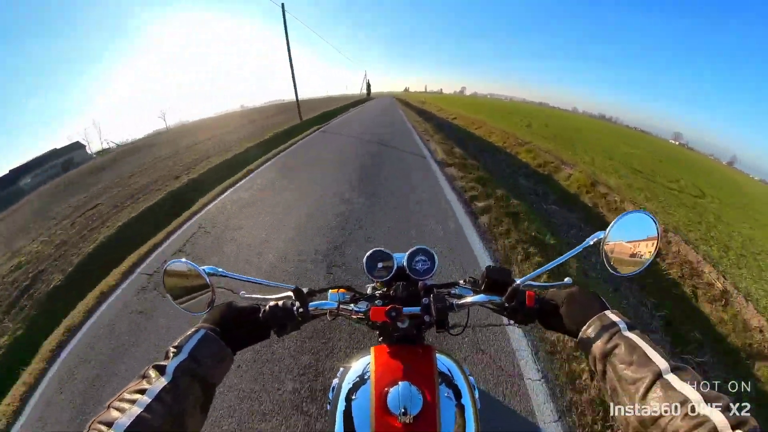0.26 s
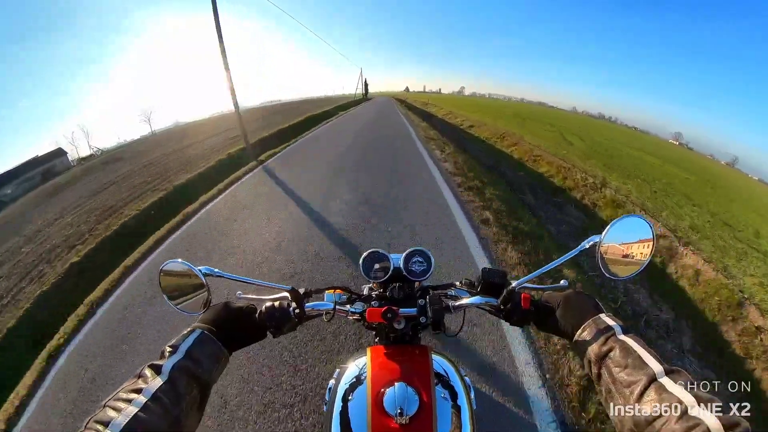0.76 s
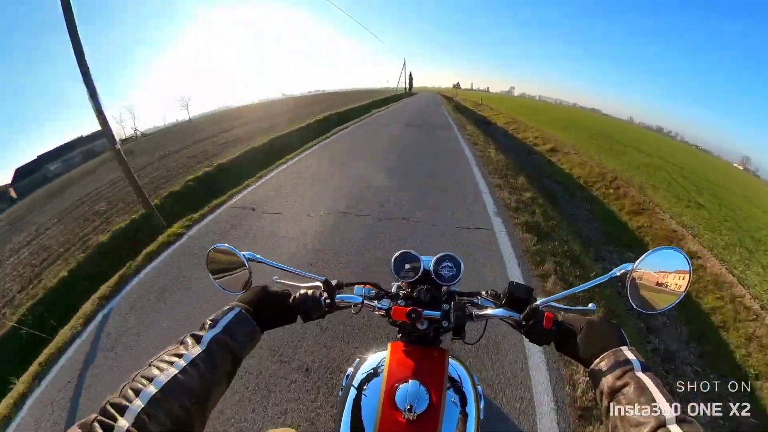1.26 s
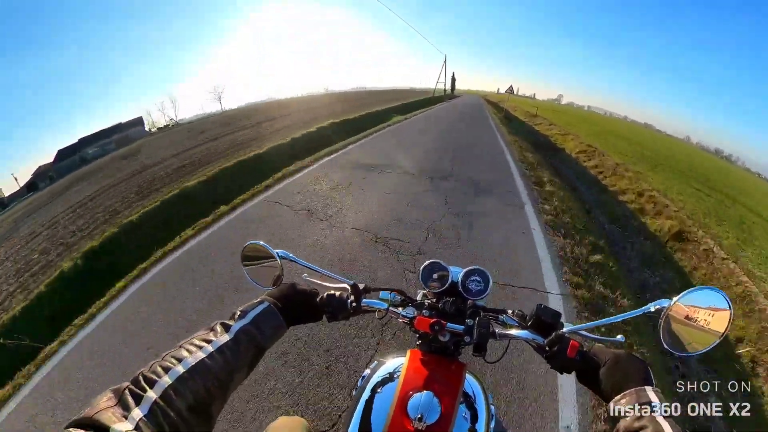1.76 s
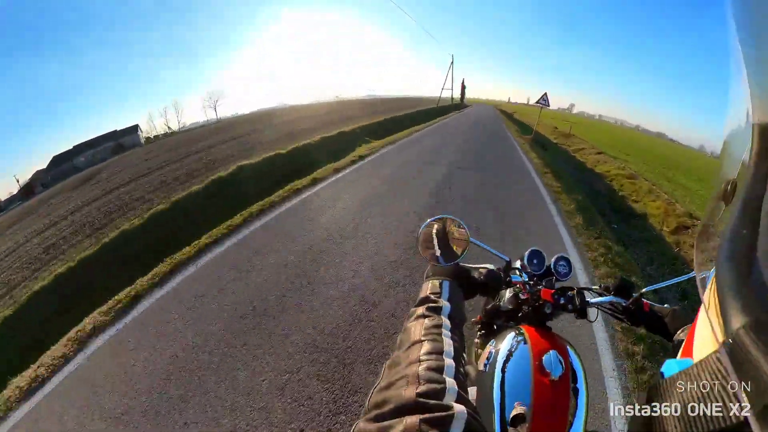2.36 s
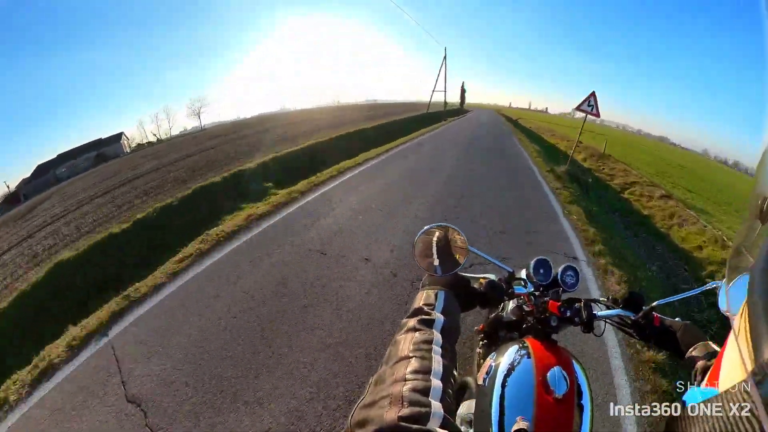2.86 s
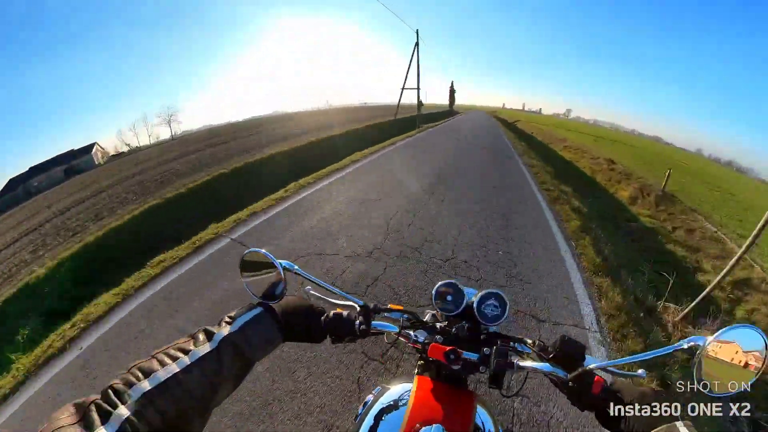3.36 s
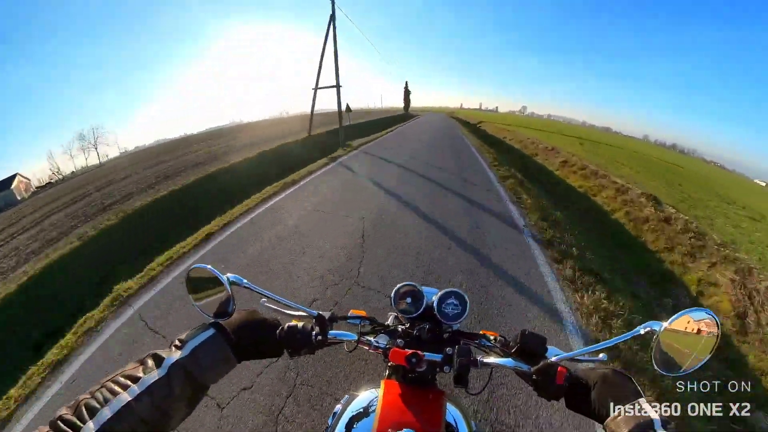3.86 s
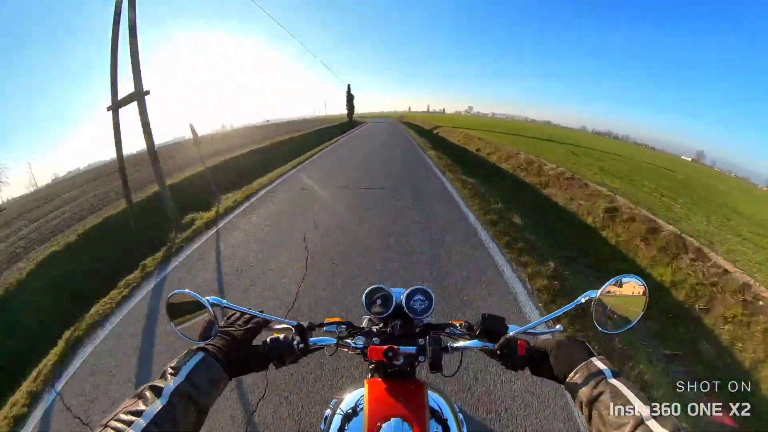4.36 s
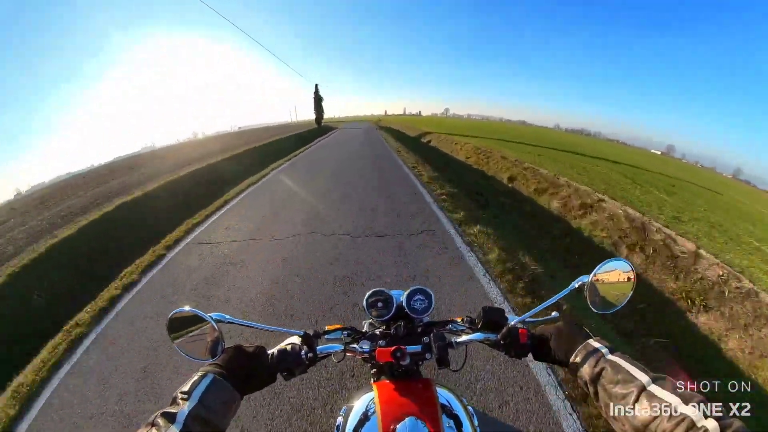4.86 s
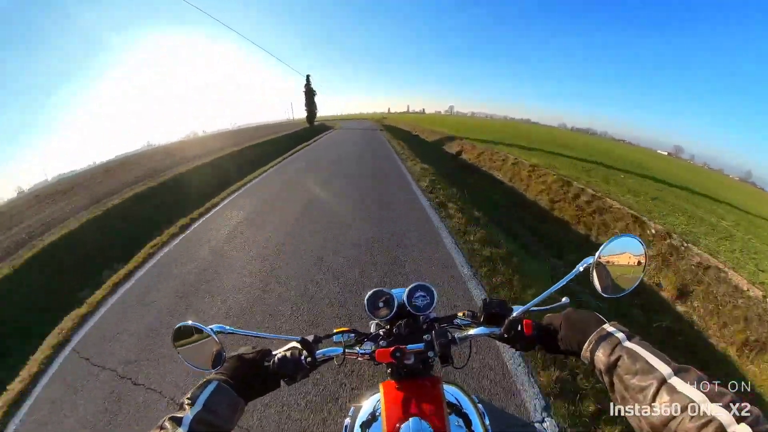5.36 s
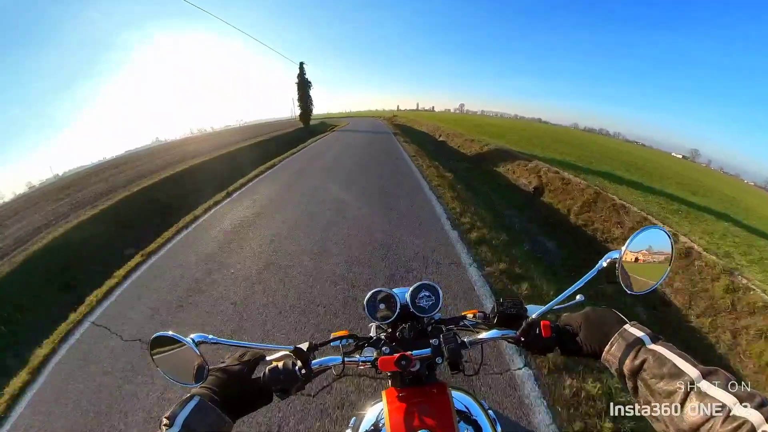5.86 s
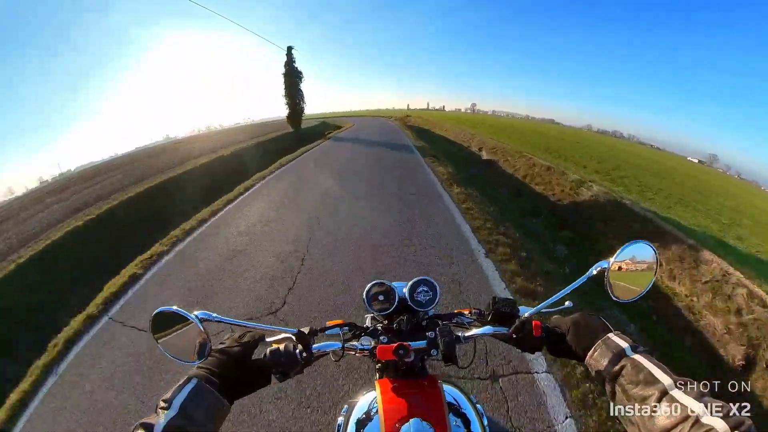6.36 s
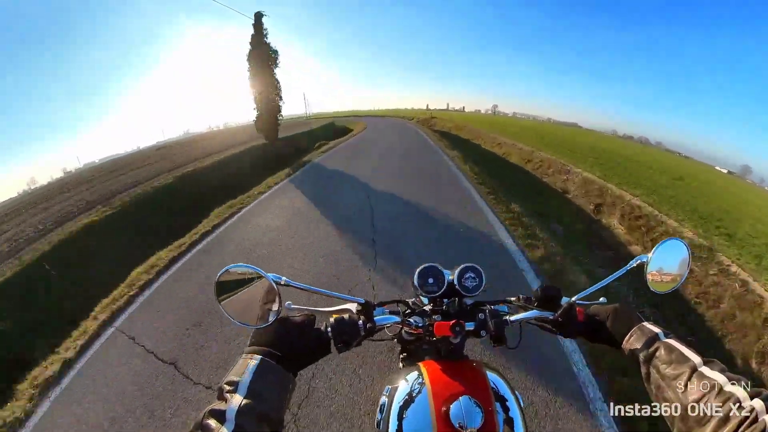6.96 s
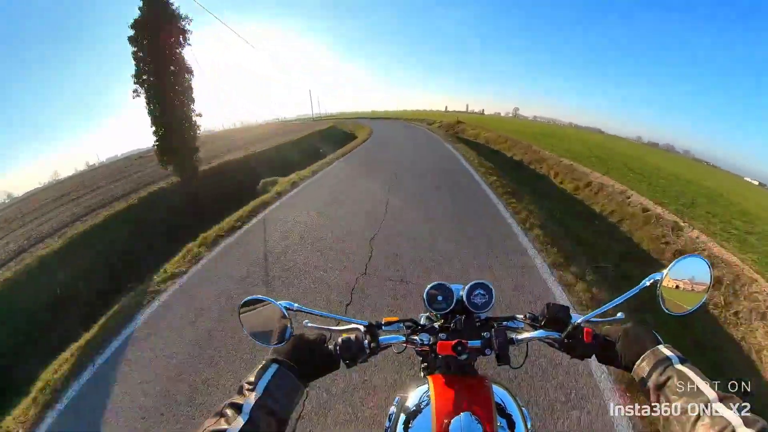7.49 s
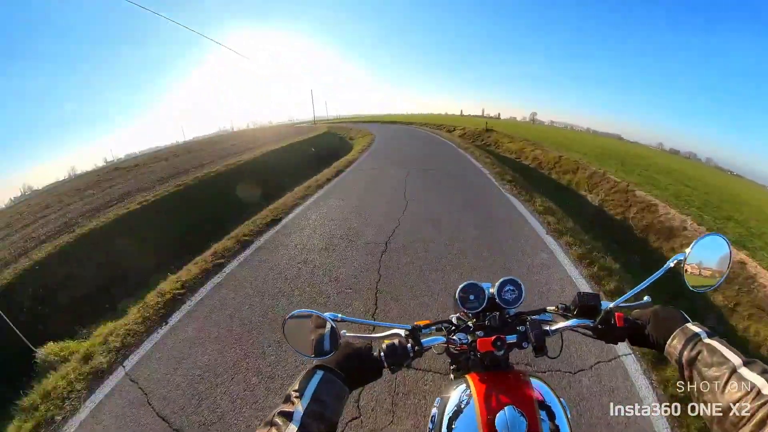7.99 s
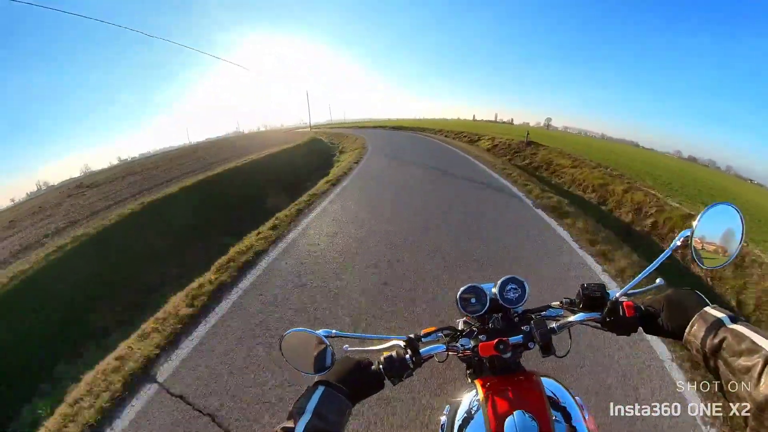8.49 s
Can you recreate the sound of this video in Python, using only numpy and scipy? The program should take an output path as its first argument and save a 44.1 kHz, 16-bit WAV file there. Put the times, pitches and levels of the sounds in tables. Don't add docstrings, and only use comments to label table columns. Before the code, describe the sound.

Raspy uneven motorcycle exhaust climbs in revs amid bump knocks and dropouts, drops quiet for a gear change around five seconds, then drives on.

```python
import sys
import numpy as np
from scipy import signal
from scipy.fft import rfft, irfft, next_fast_len
from scipy.io import wavfile
from scipy.ndimage import uniform_filter1d

SR = 44100
rng = np.random.default_rng(int(sys.argv[2]) if len(sys.argv) > 2 else 0)


def volts(x):
    e = np.asarray(x, float) / 20
    return 10 ** e


def master(y):
    cut = np.clip(np.atleast_2d(y).T, -1, 1)
    pcm = np.round(cut * 32767)
    wavfile.write(sys.argv[1], SR, pcm.astype(np.int16))


N = 384993

# [start_s, cycles_per_s]
ENGINE_SPEED = [(0, 20.843), (.8, 22.466), (1.6, 24.169), (3.4, 27.466), (4.5, 28.912), (4.76, 28.36),
                (5.12, 19.104), (5.22, 26.897), (5.3, 18.426), (5.45, 17.748), (5.9, 17.648),
                (6.02, 21.573), (6.3, 21.603), (6.6, 21.167), (8.3, 22.235), (8.73, 23.345)]
# [start_s, exhaust_db, rasp_db]
RIDER = [(0, -24, -42), (.26, -22.5, -47.5), (.55, -23, -40.5), (1.24, -23.5, -40.5), (1.4, -21, -37),
         (2.15, -22.5, -38), (2.7, -25, -49), (3.55, -22.5, -35.5), (4.15, -26, -39), (4.6, -24.5, -39.5),
         (5.2, -26, -46), (5.55, -35.5, -52.5), (6.1, -33, -47), (6.7, -25, -43), (7.18, -23, -46.5),
         (7.45, -23.5, -38.5), (8.3, -25, -42.5), (8.73, -23.5, -39)]
# [start_s, pressure_at_cut, pressure_at_return]
LOST_PACKETS = [
    (.3779, .085, .07),
    (.6179, -.09, -.065),
    (.8579, -.065, -.11),
    (1.0979, .12, .1),
    (1.5779, -.135, -.095),
    (2.0379, .03, .04),
]
PACKET_S = .02
USUAL_DB, USUAL_STRAIN_DB, USUAL_HZ = -22.5, -43, 23


def rms_one(x):
    return x / np.sqrt(np.mean(x ** 2) + 1e-20)


def in_time(rows):
    s, *columns = np.transpose(rows)
    return [np.interp(np.arange(N) / SR, s, c) for c in columns]


def swells(rows):
    t = np.arange(N) / SR
    return sum(volts(db) * np.exp(-.5 * ((t - s) / width) ** 2) for s, db, width in rows)


def noise():
    return rng.standard_normal(N)


def coloured(x, spectrum):
    size = next_fast_len(N)
    hz, db = np.transpose(spectrum)
    log_hz = np.log(np.arange(size // 2 + 1) * SR / size + 1)
    gain = volts(np.interp(log_hz, np.log(hz), db, -90, -90))
    return rms_one(irfft(rfft(x, size) * gain, size)[:N])


def drift(rate_hz):
    low_pass = signal.butter(2, rate_hz, fs=SR / 40, output="sos")
    slow = signal.sosfilt(low_pass, rng.standard_normal(N // 40 + 2002))
    settled = rms_one(slow[2000:])
    return np.interp(np.arange(N) / 40, np.arange(len(settled)), settled)


def ring(clicks, hz, t60):
    r = volts(-60 / (t60 * SR))
    w = 2 * np.pi * hz / SR
    return signal.lfilter([0, np.sin(w)], [1, -2 * r * np.cos(w), r * r], clicks + 1e-18)


def puffs(clicks, echoes):
    ms = np.arange(-600, 601) / SR * 1000
    shape = sum(h * np.exp(-.5 * ((ms - at) / w) ** 2) for at, h, w in echoes)
    return signal.fftconvolve(clicks, shape, "same")


def revs():
    return in_time(ENGINE_SPEED)[0] - USUAL_HZ


def shut():
    # [start_s, end_s]
    closings = [
        (4.76, 5.12),
        (5.26, 5.7),
    ]
    t, snap_s = np.arange(N) / SR, 0.014
    return sum(np.clip((t - a) / snap_s, 0, 1) * np.clip((b - t) / snap_s, 0, 1) for a, b in closings)


def crank():
    # [start_s, frames_gained]
    buffer_slips = [(.44, 1), (.485, -1), (.785, 1), (.858, 1), (.915, 1), (.95, 1), (1.222, 2), (1.3, -1),
                    (1.44, -2), (1.485, 1), (1.52, -1), (1.578, 2), (1.785, 1), (6.585, 1), (8.47, -1)]
    frame_s, start_cycles = .00725, .296
    gains = [(s, frames * frame_s) for s, frames in buffer_slips]
    gains += [(row[0], -PACKET_S) for row in LOST_PACKETS]
    jumps = np.zeros(N)
    for s, gained_s in gains:
        jumps[round(s * SR)] += gained_s * SR
    rate = in_time(ENGINE_SPEED)[0]
    return start_cycles + np.cumsum(rate * (1 + uniform_filter1d(jumps, size=40))) / SR


def once_a_cycle(cycles, at, spread_db, jitter_ms):
    marks = np.flatnonzero(np.diff(np.floor(cycles - at)) > 0)
    chance = rng.standard_normal((250, 2))[:len(marks)]
    moved = marks + (chance[:, 0] * jitter_ms * SR / 1000).astype(int)
    clicks = np.zeros(N)
    clicks[np.clip(moved, 0, N - 1)] = volts(spread_db * chance[:, 1])
    return clicks


def gate(cycles, marks, floor):
    height = floor
    for at, width, h in marks:
        distance = (cycles - at + .5) % 1 - .5
        height = height + h * np.exp(-.5 * (distance / width) ** 2)
    return height


def wind():
    # [pitch_hz, level_db_per_hz]
    wind_colour = [(15, -28.5), (28, -12), (45, -4.5), (70, 2), (110, -8.5), (200, -40.5)]
    # [centre_s, peak_db, width_s]
    gusts = [
        (.7, -33.5, .15),
        (2.1, -32.5, .4),
        (3.2, -34, 0.18),
        (4.08, -17, 0.051),
        (4.9, -20.5, .3),
        (5.7, -24, 0.93),
        (7.56, -18, 0.24),
        (8.73, -15, 0.17),
    ]
    lumpy = noise() * volts(4.0 * drift(12))
    return volts(-10) * (volts(-41) + swells(gusts)) * coloured(lumpy, wind_colour)


def jolts():
    # [centre_s, peak_db, pitch_hz, rise_ms]
    knocks = [(.496, -8, 188, 1.2), (.507, -12.5, 193, 3), (.538, -18, 654, 4), (.537, -20, 322, 4),
              (0.552, -9, 286, 4.1), (.567, -8.5, 225, 1.2), (.576, -10, 237, 2.9), (.7659, -5, 790, 0.73),
              (0.7658, -10, 1020, 0.96), (.765, -9, 470, 1.8), (.921, -12, 330, 1), (.93, -21, 695, 0.84),
              (1.207, -7, 234, 1.8), (1.2159, -1.5, 226, 1.4), (1.21, -20, 575, 5.2), (1.364, -3, 260, 3.1),
              (1.375, -13, 266, 1.66), (1.386, -11, 288, 5.6), (1.421, -8.5, 225, 13),
              (1.502, -27.5, 610, 2.2), (1.443, -19.5, 914, 1.6), (2.146, -18.5, 257, 8.4),
              (5.281, -27.5, 864, 0.64), (5.403, -14.5, 507, 1), (5.405, -16.5, 131, 7.8),
              (5.434, -25, 830, 0.65), (5.458, -21, 477, 2), (5.516, -21, 246, 1.5), (8.46, -28.5, 940, 3)]
    # [centre_s, peak_db, pitch_hz]
    rattles = [(0.4645, -29, 3420), (0.6737, -22.5, 3360), (.9178, -26, 3220), (.9378, -28, 3140),
               (1.0188, -25.5, 3520), (1.2128, -32, 3280), (1.317, -25, 3200), (1.3323, -26, 3100),
               (1.3588, -23, 2920), (1.4022, -30, 3500), (1.5404, -22, 3110), (1.5564, -26, 2800),
               (1.6018, -21, 2940), (1.6432, -19.5, 3340), (1.6834, -20.5, 3060), (1.7255, -22, 3200),
               (1.7669, -26, 3000), (2.0015, -21.5, 2850), (2.1026, -28, 3116), (2.183, -20, 3030),
               (2.459, -26.5, 3360), (2.5745, -26.5, 3310), (3.067, -29, 3180), (3.651, -19.5, 3140),
               (7.217, -32.5, 2900), (7.5868, -22, 3300)]
    rattle_rise_ms, fall_per_rise = 0.82, 1.72
    scuff = volts(-11) * coloured(noise(), [(100, -22.5), (250, 5.0), (600, -9.5), (1100, -16.5), (1600, -27)])
    grain = volts(3.0 * drift(160))
    steps = np.arange(-2600, 2600)
    ms = steps / SR * 1000
    out = np.zeros(N)
    for s, db, hz, rise in list(knocks) + [(s, db - 9, hz, rattle_rise_ms) for s, db, hz in rattles]:
        at = round(s * SR) + steps
        width = np.where(ms < 0, rise, rise * fall_per_rise)
        swell = volts(db) * np.exp(-.5 * (ms / width) ** 2)
        out[at] += swell * (grain[at] * np.cos(2 * np.pi * hz * ms / 1000) + scuff[at])
    return out


def chirp():
    # [time_s, pitch_hz, level_db]
    belt = [
        (5.6, 2500, -75),
        (5.64, 2360, -59),
        (5.72, 2240, -64),
        (5.81, 2150, -70),
        (5.845, 2450, -53),
        (5.885, 2520, -60),
        (5.9, 2750, -64),
        (5.99, 3040, -59),
        (6.02, 3100, -93),
    ]
    hz, db = in_time(belt)
    level = volts(db + 3 * drift(40))
    return level * np.sin(2 * np.pi * np.cumsum(hz + 35 * drift(60)) / SR)


def heat_shield(strain_db):
    # [pitch_hz, level_db_per_hz]
    shield_colour = [(1900, -31.5), (2150, -8.5), (2230, 2), (2320, -6.5), (2700, -12), (2950, -2.5),
                     (3100, -9), (3500, -27)]
    buzz_db = -60.5 + 1.58 * (strain_db - USUAL_STRAIN_DB) + 0.89 * revs()
    return volts(buzz_db + 4.2 * drift(28)) * coloured(noise(), shield_colour)


def air_spits():
    # [centre_s, width_ms, level_db]
    spits = [
        (.55, 13, -54.5),
        (2.31, 9.3, -52.5),
        (2.37, 8.3, -53),
        (2.487, 1.5, -44),
        (2.546, 1.5, -54),
        (3.151, 50, -57),
        (5.167, 1.8, -46.5),
        (6.68, 36, -54.5),
    ]
    ms = np.arange(N) / SR * 1000
    level = sum(volts(db) * np.exp(-.5 * ((ms - 1000 * s) / width) ** 2) for s, width, db in spits)
    return level * coloured(noise(), [(3300, -25.5), (4000, -4.5), (5500, -2.0), (6600, -7.5), (7400, -32)])


def valve_gear(cycles):
    # [pitch_hz, level_db_per_hz]
    valve_colour = [(3500, -24), (3800, -3.5), (4500, -6.5), (4850, -2), (5050, -2), (5500, -1),
                    (6000, -5.5), (6600, -16.5), (7200, -29), (8000, -46.5)]
    # [time_s, level_db]
    sizzle = [(0, -71), (.5, -62), (1.19, -68), (2.3, -60.5), (2.5, -62), (2.67, -77.5), (3.1, -65),
              (3.7, -65), (4.76, -72), (5.69, -84), (6.42, -75.5), (6.73, -66), (7.27, -61.5), (8.05, -67),
              (8.73, -64.5)]
    four_ticks = [(-.03, 0.13, 1.5), (.27, 0.052, 0.77), (.55, 0.049, 0.85), (.75, 0.044, 0.51)]
    ticks = gate(cycles, four_ticks, floor=0.6) * volts(3.1 * drift(40))
    sizzle_db = in_time(sizzle)[0]
    song_hz = np.minimum(5350 + 239 * revs(), 5620)
    fast_db = -3.1 * np.maximum(in_time(ENGINE_SPEED)[0] - 22.5, 0)
    closed_db = 6 * np.minimum(in_time(RIDER)[0] + 30.5, 0)
    song_level = volts(sizzle_db + 3.5 + fast_db + closed_db - 25 * shut())
    song = song_level * np.sqrt(ticks) * drift(150) * np.sin(2 * np.pi * np.cumsum(song_hz) / SR)
    return volts(sizzle_db + 3.5) * coloured(noise() * ticks, valve_colour) + song


def intake(cycles):
    level_db = -26.5 + 0.37 * revs()
    first = once_a_cycle(cycles, .345, spread_db=2.5, jitter_ms=0.32)
    second = once_a_cycle(cycles, -.43, spread_db=2.5, jitter_ms=0.32)
    gulp = [(1, 0.98, 1.91), (3, -0.48, 1.6), (4, -0.021, 4.0)]   # (ms, height, width ms)
    return volts(level_db - 1.5) * rms_one(puffs(first + 0.23 * second, gulp))


def boom(cycles):
    # [centre_s, peak_db, width_s]
    overrun = [
        (4.84, -17.5, 0.034),
        (4.95, -26, 0.063),
        (5.07, -17.5, 0.025),
        (5.25, -24, 0.014),
    ]
    # [centre_s, peak_db, width_s]
    fifth_swells = [
        (5.2, -24.5, 0.029),
        (5.95, -37, 0.25),
        (6.5, -29, 0.34),
    ]
    third = swells(overrun) * volts(1.5 * drift(15)) * np.sin(2 * np.pi * (3 * cycles + .3))
    fifth = swells(fifth_swells) * np.sin(2 * np.pi * (5 * cycles + .62))
    return third + fifth


def rasp(cycles, level_db, throttle_db):
    # [pitch_hz, level_db_per_hz]
    rasp_colour = [(600, -19), (750, -9), (950, -0.5), (1150, -7.5), (1400, 0), (1750, -7), (1950, -10),
                   (2230, -15.5), (2500, -12), (3000, -16), (3400, -18), (3700, -23.5), (4500, -35.5)]
    # [pitch_hz, level_db_per_hz]
    tick_colour = [(2300, -28.5), (2800, -4.5), (3250, 1.5), (3550, -8.5), (3900, -32)]
    blur_db = -3.5 * np.maximum(in_time(ENGINE_SPEED)[0] - 27, 0)
    bite_db = 2.2 * np.minimum(throttle_db - USUAL_DB + 1, 0)
    load = volts(3 + np.clip(bite_db + blur_db - 9 * shut(), -12, 0))
    crack = load * puffs(once_a_cycle(cycles, -0.041, spread_db=3.4, jitter_ms=0.29), [(0, 1.3, 1.8)])
    tear = gate(cycles, [(-.38, 0.093, 0.23), (.05, 0.14, .3)], floor=0.58) * volts(1.7 * drift(21))
    tick = volts(-16) * coloured(noise() * crack, tick_colour)
    return volts(level_db - 0.5) * (coloured(noise() * (crack + tear), rasp_colour) + tick)


def exhaust(cycles, level_db):
    # [after_firing_ms, height, width_ms]
    front_pipe = [
        (-1.5, 0.2, 0.68),
        (1.55, -0.47, 0.8),
        (4, 0.04, 0.7),
        (7.5, 0.061, 0.32),
        (8.5, -0.12, 1.8),
    ]
    # [after_firing_ms, height, width_ms]
    rear_pipe = [
        (-1.3, 0.6, 0.62),
        (1.55, -0.4, 0.72),
        (5, 0.1, .9),
        (7, 0.02, 0.43),
        (-6, 0.05, 1),
    ]
    # [pitch_hz, level_db, fall_60db_s]
    pipe_ring = [
        (433.4, -21.5, 0.038),
        (464.6, -19, 0.071),
        (534, -27.5, 0.03),
        (640, -31, 0.012),
    ]
    # [pitch_hz, level_db_per_hz]
    flow_colour = [(29, -39), (50, -20.5), (86, -7.5), (108, -0.5), (744, -22.5), (908, -30), (945, -33.5),
                   (1200, -31), (1560, -80), (2640, -120)]
    front = once_a_cycle(cycles, -.372, spread_db=0.5, jitter_ms=0.11)
    rear = once_a_cycle(cycles, 0., spread_db=1.2, jitter_ms=0.14)
    rings = sum(volts(db) * ring(front + 0.77 * rear, hz, t60) for hz, db, t60 in pipe_ring)
    rings = puffs(rings, [(3.46, 0.043, 0.21)])
    ring_db = 0.27 + 0.65 * revs() + 0.5 * shut()
    clean = rms_one(puffs(front, front_pipe) + puffs(rear, rear_pipe) + volts(ring_db) * rings)
    clean = clean * volts(-4 * shut())
    flow = noise() * gate(cycles, [(-.3, 0.089, 0.26), (.05, 0.092, 0.14)], floor=1.0)
    rough_db = -10.3 - .9 * (level_db - USUAL_DB)
    return volts(level_db + 4.5) * (clean + volts(rough_db) * coloured(flow, flow_colour))


def scene():
    exhaust_db, rasp_db = in_time(RIDER)
    cycles = crank()
    around = wind() + jolts() + chirp() + heat_shield(rasp_db) + air_spits()
    engine = valve_gear(cycles) + intake(cycles) + boom(cycles)
    pipes = rasp(cycles, rasp_db, exhaust_db) + exhaust(cycles, exhaust_db)
    return (around + engine + pipes)[None]


def roll_off(x):
    return signal.sosfilt(signal.butter(12, 15750, fs=SR, output="sos"), x)


def record(dry):
    # [start_s, length_ms, loop_ms]
    patched = [
        (.312, 12, 4),
        (.534, 12, 3),
        (.66, 13, 4),
        (.74, 10, 3.5),
        (.789, 12, 4),
    ]
    # [centre_s, width_ms, depth_db]
    fades = [
        (5.293, 6.6, -7),
        (6.555, 7, -16.5),
    ]
    x = signal.sosfilt(signal.butter(3, 40, "high", fs=SR, output="sos"), dry[0])
    t = np.arange(N) / SR
    for s, ms, loop_ms in patched:
        at, loop, size = round(s * SR), round(loop_ms * SR / 1000), round(ms * SR / 1000)
        scrap = x[at - loop:at] + np.linspace(1, 0, loop) * (x[at] - x[at - loop])
        fade = signal.windows.tukey(size, .3)
        x[at:at + size] += fade * (np.resize(scrap - scrap.mean(), size) - x[at:at + size])
    ramp = signal.windows.hann(200)
    for s, before, after in LOST_PACKETS:
        cut, back = round(s * SR), round((s + PACKET_S) * SR)
        x[cut - 100:cut] += (1.3 * before - x[cut - 1]) * ramp[:100]
        x[back:back + 100] += (1.2 * after - x[back]) * ramp[100:]
        x[cut:back] *= .01
    for s, ms, db in fades:
        x *= volts(db * np.exp(-((t - s) * 1000 / ms) ** 4))
    mix = np.clip(x + volts(-81.5) * noise(), -1, 1)[None]
    return roll_off(mix)


dry = scene()
out = record(dry)
master(out)
```